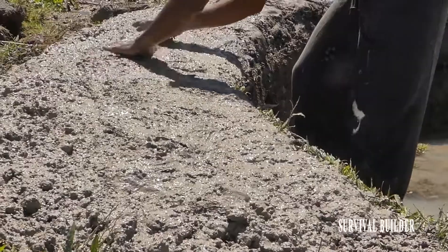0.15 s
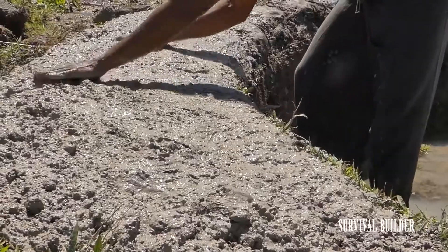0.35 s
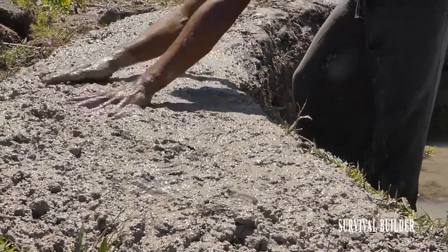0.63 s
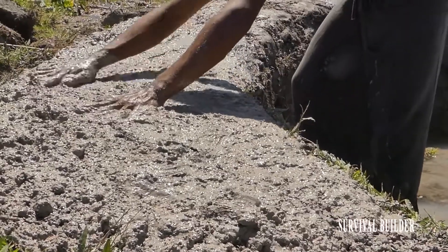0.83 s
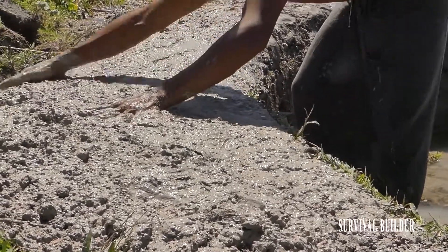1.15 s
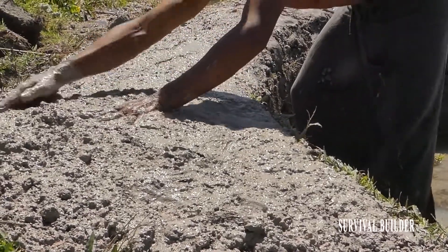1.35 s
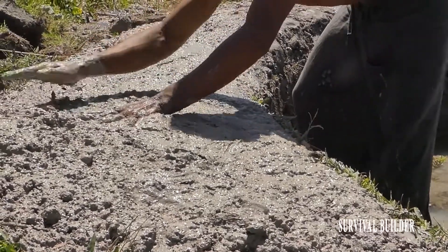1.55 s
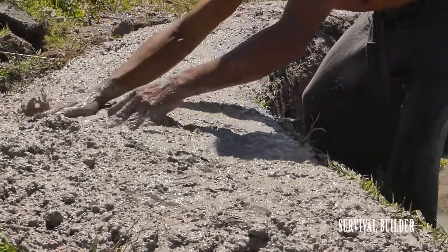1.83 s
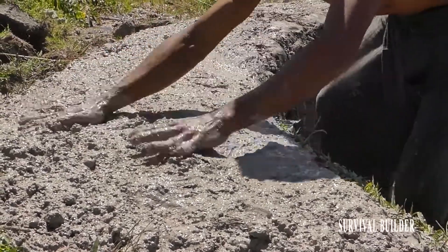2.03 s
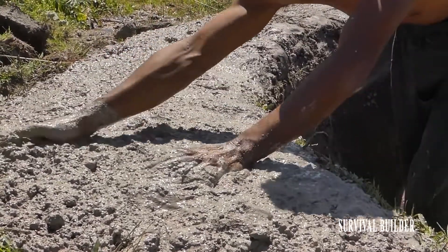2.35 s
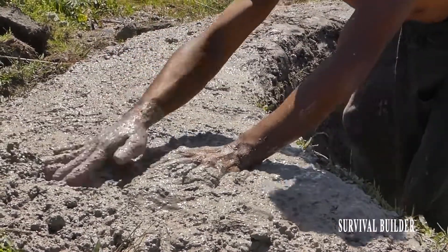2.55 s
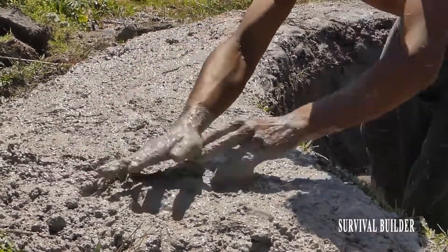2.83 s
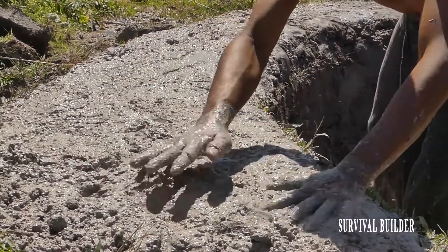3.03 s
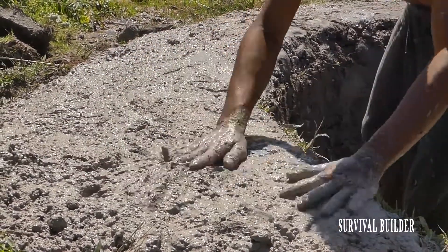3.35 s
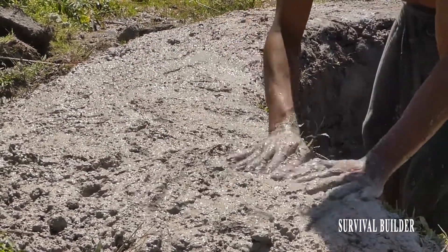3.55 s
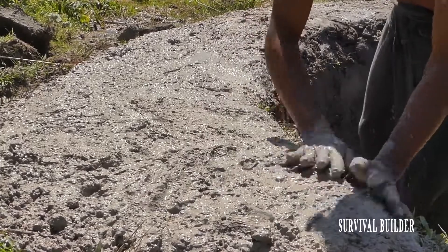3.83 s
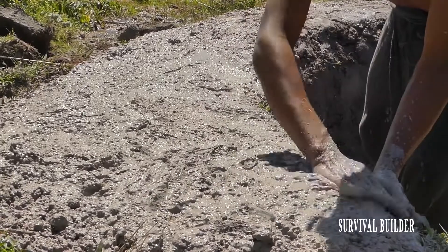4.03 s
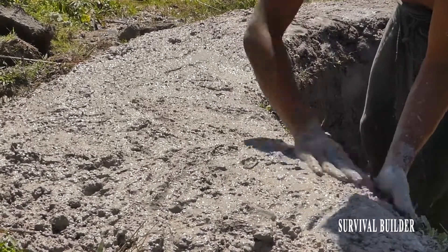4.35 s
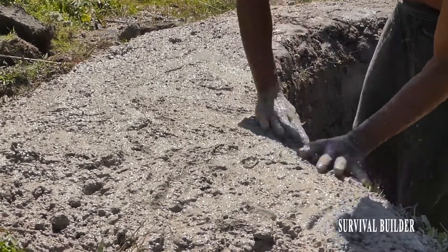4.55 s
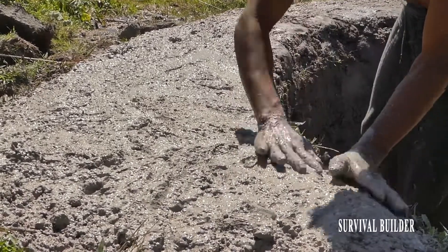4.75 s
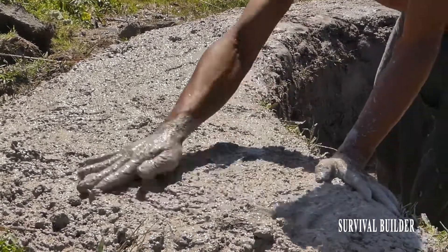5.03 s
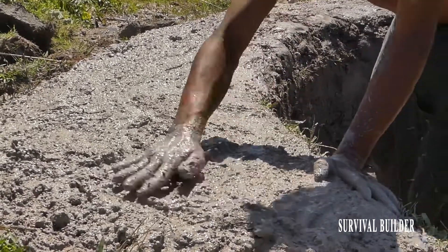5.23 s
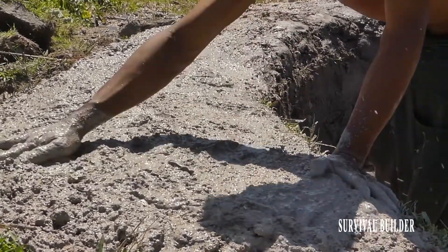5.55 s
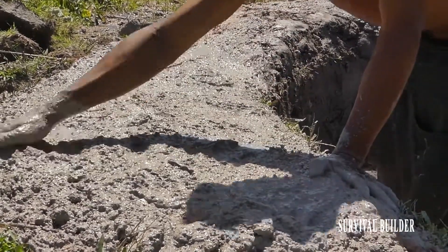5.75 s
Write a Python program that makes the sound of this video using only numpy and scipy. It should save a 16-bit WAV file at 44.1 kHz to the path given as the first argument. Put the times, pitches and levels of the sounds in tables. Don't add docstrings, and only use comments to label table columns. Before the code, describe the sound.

Bare palms pat and rub wet gritty mix outdoors, with sharp wet slaps, clicks and pops over soft fizz, hiss and a distant chugging engine.

```python
import sys
import numpy as np
from scipy import signal
from scipy.fft import rfft, irfft, next_fast_len
from scipy.io import wavfile
from scipy.ndimage import map_coordinates

SR = 44100
rng = np.random.default_rng(int(sys.argv[2]) if len(sys.argv) > 2 else 0)


def wav_record(signal):
    frames = np.transpose(np.atleast_2d(signal))
    bounded = np.clip(frames, -1, 1)
    quanta = np.round(bounded * 32767).astype(np.int16)
    wavfile.write(sys.argv[1], SR, quanta)


def rack_gain(trim_db):
    fader = np.asarray(trim_db, float)
    return 10 ** (fader / 20)


N = 259308


def unit(x):
    return x / np.sqrt(np.mean(x ** 2) + 1e-20)


def wobble(rate):
    knots = rng.standard_normal(int(N * rate / SR) + 4)
    return map_coordinates(knots, [np.arange(N) * rate / SR])


def noise(spectrum, alike, pan_db):
    f, db = np.transpose(spectrum)
    m = next_fast_len(N)
    hz = np.fft.rfftfreq(m, 1 / SR)
    gain = rack_gain(np.interp(np.log(hz + 1), np.log(f), db, left=-120, right=-120))
    a, b = irfft(rfft(rng.standard_normal((2, m))) * gain, m)[:, :N]
    turn = np.arccos(np.clip(alike, 0, 1)) / 2
    mid, side = np.cos(turn) * a, np.sin(turn) * b
    return unit(np.array([mid + side, mid - side])) * rack_gain([[pan_db / 2], [-pan_db / 2]])


def add(out, s, x):
    at = round(s * SR)
    x = x[..., max(-at, 0):]
    part = out[..., max(at, 0):][..., :x.shape[-1]]
    part += x[..., :part.shape[-1]]


def wavelet(hz, width):
    t = np.arange(-SR // 40, SR // 40) / SR
    return -np.cos(2 * np.pi * hz * t) * np.exp(-(t / width) ** 2)


def grains(count, mid_hz, cycles, scatter_db):
    when, side = rng.random((2, count, 1))
    pitch, size = rng.standard_normal((2, count, 1))
    hz = mid_hz * np.exp(0.474 * np.clip(pitch, -1.6, 3))
    t = np.arange(256) / SR
    sizes = rack_gain(scatter_db * np.clip(size, -3, 2))
    rings = sizes * np.sin(2 * np.pi * hz * t) * np.exp(-t * hz / cycles)
    at = ((when * N).astype(int) + np.arange(t.size)).ravel()
    ports = []
    for sign in (1, -1):
        panned = rings * rack_gain(sign * 20.0 * (side - .5))
        ports.append(np.bincount(at, panned.ravel(), N)[:N])
    return unit(np.array(ports))


def engine(level_db):
    # (delay [s], level [dB], ring pitch [Hz], length [s])
    thud_train = [
        (0, -7, 94.5, 0.029),
        (0, 4, 151, 0.0034),
        (.0225, 1.5, 205, 0.0069),
        (.039, -2, 198, 0.0087),
        (.048, -9, 240, 0.017),
        (.057, -4, 200, 0.0067),
        (.069, -3, 170, 0.0067),
    ]
    # (frequency [Hz], density [dB per Hz])
    drone_colour = [(40, -9), (95, -5), (125, -2.5), (180, -5), (300, 2), (370, -18)]
    period_s, first_s = .11172, .023
    cycle, out = np.zeros(SR // 5), np.zeros(N + SR)
    for delay, db, hz, width in thud_train:
        add(cycle, 0.02497 + delay, rack_gain(db) * wavelet(hz, width))
    starts = first_s + period_s * np.arange(-1, N / SR / period_s + 1)
    for s, (late, size) in zip(starts, rng.standard_normal((len(starts), 2))):
        add(out, s + .15 + 0.00062 * late, rack_gain(1.57 * size) * cycle)
    thuds = unit(out[SR // 5:][:N]) * rack_gain([[2.5], [-3]])
    drone = noise(drone_colour, alike=0.091, pan_db=5.5)
    return rack_gain(level_db) * (rack_gain(-1.54) * thuds + rack_gain(-2.5) * drone)


def outdoors():
    # (start [s], end [s], rise over the calm [dB])
    gust_spans = [
        (1.672, 2.544, 11.5),
        (5.468, 6.1, 11),
    ]
    # (frequency [Hz], density [dB per Hz])
    breeze_colour = [(200, -58), (320, -6), (410, 0), (500, -2.5), (900, -13), (2500, -31)]
    field_colour = [(300, -39), (550, -4.5), (800, 9), (1000, 2.5), (1300, 3.5), (1900, 1.5), (2300, -27),
                    (4000, -31)]
    hiss_colour = [(1800, -18), (2600, 1), (7500, -9), (10000, 1.5), (15600, -6), (16200, -40)]
    calm_db, field_db, hiss_db, gust_edge_s = -54, -48, -57.5, 0.2
    t = np.arange(N) / SR
    breeze_db = np.full(N, float(calm_db))
    for start, end, rise_db in gust_spans:
        breeze_db += rise_db * np.clip(np.minimum(t - start, end - t) / gust_edge_s + .5, 0, 1)
    breeze = unit(rack_gain(2.2 * wobble(19))) * noise(breeze_colour, alike=0.054, pan_db=5.0)
    field = unit(rack_gain(1.96 * wobble(20))) * noise(field_colour, alike=0.2, pan_db=2.0)
    hiss = noise(hiss_colour, alike=0.24, pan_db=-7.0)
    air = rack_gain(breeze_db) * breeze + rack_gain(field_db) * field + rack_gain(hiss_db) * hiss
    return air + engine(level_db=-46.0)


def strokes():
    # (time [s], fizz level [dB])
    palm_slide = [(0.05, -45), (.25, -50.5), (.5, -47.5), (.66, -46.5), (.82, -51), (1, -46), (1.15, -55),
                  (1.35, -47), (1.63, -49), (2.5, -48), (3.45, -47.5), (3.7, -49.5), (4.3, -50),
                  (4.52, -47.5), (4.79, -48.5), (5.13, -47), (5.35, -52.5), (5.65, -45.5)]
    # (frequency [Hz], density [dB per Hz])
    fizz_colour = [(900, -2), (1400, 1), (2200, -3.5), (2800, 0), (3500, -5), (4200, -1.5), (7500, -6),
                   (10000, -6.5), (15600, -15), (16200, -40)]
    fizz_db = np.interp(np.arange(N) / SR, *np.transpose(palm_slide))
    clumps = unit(rack_gain(1.1 * wobble(14) + 1.4 * wobble(60) + 1.6 * wobble(500)))
    fizz = clumps * noise(fizz_colour, alike=0.75, pan_db=-0.5)
    pressure_db = 0.24 * (fizz_db + 47) + 1.36 * wobble(11) + 5.0 * np.minimum(wobble(45), 1.2)
    grit = grains(count=8000, mid_hz=2800, cycles=6.0, scatter_db=6.5) * rack_gain(pressure_db)
    return rack_gain(fizz_db + 1.0) * (rack_gain(-1.5) * fizz + rack_gain(-2.5) * grit)


def contacts():
    # (peak time [s], splash [dB], rise [ms], t60 [s], body
    # against splash [dB])
    flat_slaps = [(1.232, -35, 4.8, 0.1, 1.5), (1.72, -19, 4.1, 0.047, 1.5), (1.915, -18, 1.9, 0.017, 4.5),
                  (1.9212, -26, 1.8, 0.016, 4), (2.1186, -15, 4.8, 0.0086, 6),
                  (2.301, -21, 4.4, 0.045, 4.5), (2.773, -26.5, 1.8, 0.03, -2),
                  (2.785, -21, 6.8, 0.067, -0.5), (2.9664, -21.5, 1, 0.072, 5),
                  (2.9805, -22.5, 2.1, 0.014, 1), (3.064, -20.5, 2.7, 0.036, 4),
                  (3.1823, -18, 2.3, 0.044, -2.5), (3.361, -35, 14.4, 0.068, 7.5),
                  (3.4006, -22.5, 0.36, 0.019, -8), (3.405, -15.5, 1.2, 0.016, -6),
                  (3.417, -34.5, 3.1, 0.041, 14.5), (3.5752, -27, 1.2, 0.059, 5),
                  (3.8287, -31.5, 2, 0.06, 1), (5.0381, -24.5, 1, 0.015, 4), (5.268, -27, 2.5, 0.043, 5),
                  (5.465, -19.5, 1.5, 0.059, 0), (5.6016, -22.5, 1.6, 0.062, -0.5),
                  (5.78, -22.5, 4.9, 0.029, 3)]
    # (peak time [s], splash [dB], t60 [s], body against splash [dB])
    drags = [(.0913, -45.5, 0.37, 8), (0.299, -49, 0.078, 4), (.3466, -44, 0.067, 4), (0.383, -42, 0.35, 3),
             (0.5677, -40, 0.19, -1), (0.671, -35.5, 0.3, 0), (0.753, -48, 0.32, 11.5), (.96, -54, 0.63, 1),
             (1.085, -45.5, 0.42, 1.5), (1.325, -55, 0.11, 11.5), (1.8189, -47, 0.56, 4),
             (2.5961, -40, 0.14, 2), (4.482, -40.5, 0.14, -2), (4.547, -45, 0.44, -15),
             (4.845, -44.5, 0.22, 5.5), (4.9842, -53, 0.13, 19), (5.032, -39, 0.24, 6.5),
             (5.715, -50, 0.067, 6)]
    # (time [s], splash [dB], body against splash [dB])
    film_snaps = [(0.3156, -39, 5), (0.3475, -24, -1), (0.3574, -24.5, -3), (.5398, -39, -16),
                  (0.548, -37, -3), (0.9608, -25.5, -25), (1.308, -35, -13), (1.324, -24, -5),
                  (1.466, -20.5, -12), (2.1124, -27, 6), (2.2924, -23, 9.5), (2.518, -27.5, -35),
                  (2.634, -36, 10), (2.7854, -16.5, 2), (2.789, -26, -6), (3.186, -27, 18),
                  (3.36, -31.5, 4), (3.41, -28.5, 6), (3.584, -27, -13), (3.6273, -16.5, 9),
                  (3.6322, -19, -7), (3.8233, -20.5, 1.5), (4.9836, -46, 8), (5.0016, -51, 10),
                  (5.073, -32, -12), (5.264, -24.5, 4), (5.27, -14, 5), (5.276, -22, 2), (5.4646, -20.5, 3),
                  (5.6131, -24, 4)]
    # (time [s], splash [dB], body against splash [dB])
    light_dabs = [(.006, -35, -18), (0.059, -48, 9), (.272, -40.5, -3), (.4053, -47, 6), (0.434, -51, 17),
                  (0.455, -33, -2), (0.519, -36.5, 3), (0.524, -37, -6), (.9385, -46, 6), (1.016, -46.5, 7),
                  (1.204, -50, -10), (4.202, -47, -8), (4.457, -43, -2), (4.587, -41.5, 2), (4.875, -51, 0),
                  (.618, -41, 8), (.649, -63, 17), (0.741, -36.5, 3), (.849, -54.5, 19), (1.2793, -37, -4),
                  (1.346, -34, 0), (1.3605, -35.5, -1), (1.4388, -39, -2), (1.504, -46, 7),
                  (1.7119, -27, -2.5), (1.8997, -55, 18), (2.163, -34.5, 4), (2.183, -42, 9.5),
                  (2.658, -56, 23), (2.994, -37, 0), (3.138, -49, 9), (3.2052, -46, 10), (3.2608, -42, 5),
                  (3.5695, -40, 8), (3.6218, -35, 6), (3.722, -48, -20), (3.737, -50.5, 15),
                  (3.808, -45, -8), (3.8157, -37, -1), (4.978, -52, 11), (5.591, -40.5, 12.5),
                  (5.771, -36, 2)]
    drag_rise_s = 0.0087
    snap_s, dab_s = (0.00056, 0.012), (0.0021, 0.025)  # (rise [s], t60 [s])
    rows = [(s, db, ms / 1000, t60, body) for s, db, ms, t60, body in flat_slaps]
    rows += [(s, db, drag_rise_s, t60, body) for s, db, t60, body in drags]
    rows += [(s, db, *snap_s, body) for s, db, body in film_snaps]
    rows += [(s, db, *dab_s, body) for s, db, body in light_dabs]
    return rows


def splashes():
    # (frequency [Hz], density [dB per Hz])
    spray_colour = [(2500, -21.5), (4200, -7.5), (5500, -2), (6500, 0.5), (7800, -4), (11000, -2),
                    (15200, -8.5), (16600, -63)]
    slap_colour = [(300, 2), (1000, -13.5), (1300, -9), (2200, -5), (2800, 1), (3500, -4.5), (4200, -2),
                   (5500, -10)]
    spray, slap = np.zeros(N), np.zeros(N)
    t = np.arange(-SR // 32, SR // 6) / SR
    for s, db, rise, t60, body_db in contacts():
        swell = np.exp(np.minimum(t, 0) / max(rise, .0001))
        dribble = rack_gain(-26.0 - 60 * t / 0.097)
        shape = rack_gain(db) * np.where(t < 0, swell, rack_gain(-60 * t / t60) + dribble)
        add(spray, s + t[0], shape)
        add(slap, s + t[0], rack_gain(body_db) * shape)
    droplets = unit(rack_gain(4.05 * wobble(2500)))
    spray = rack_gain(-1.0) * spray * droplets * noise(spray_colour, alike=0.77, pan_db=0.0)
    body = rack_gain(-5.0) * unit(droplets ** 0.23) * noise(slap_colour, alike=0.89, pan_db=2.0)
    grit = rack_gain(-9.0) * grains(count=9000, mid_hz=2630, cycles=4.1, scatter_db=5.5)
    no_bass = signal.butter(2, 700, "high", fs=SR, output="sos")
    return signal.sosfilt(no_bass, spray + slap * (body + grit))


def pockets():
    # (time [s], peak level [dB], pitch [Hz]) small pockets popping under slaps and sliding palms
    small_pops = [(1.7196, -21, 1790), (1.92, -20.5, 475), (5.2705, -14, 555), (1.914, -10, 1730),
                  (1.9196, -5.5, 1500), (2.1123, -13, 3000), (2.294, -24, 2320), (2.3006, -11, 3200),
                  (2.7849, -8, 3600), (2.9668, -2.5, 4120), (2.9674, -22.5, 1160), (2.9936, -22, 1430),
                  (3.0659, -7, 2900), (3.1865, -8.5, 1160), (3.1859, -2.5, 2600), (3.1878, -15, 3050),
                  (3.262, -21, 1870), (3.266, -34, 1340), (3.5762, -12, 1800), (3.6274, -5.5, 2750),
                  (3.8266, -5, 4120), (5.2672, -10.5, 1770), (5.2695, -10, 2940), (5.6025, -9.5, 2960),
                  (0.056, -23.5, 1360), (0.0907, -24, 1400), (.132, -32, 555), (.153, -27, 1320),
                (0.3494, -18.5, 3230), (0.3579, -21, 1750), (.361, -27, 1420), (.381, -30, 1900),
                (.65, -24, 1540), (.5522, -20.5, 2740), (0.6698, -19, 1560), (0.6868, -22.5, 2020),
                (.7552, -18.5, 2680), (1.2325, -24, 3190), (1.2346, -27, 3730), (1.2372, -37, 1310),
                (1.325, -24.5, 1600), (1.437, -24, 1290), (1.585, -32, 1250), (2.598, -32.5, 590),
                (2.668, -31.5, 585), (4.486, -32, 2850), (4.847, -25.5, 4070), (4.9845, -17, 1740),
                (5.002, -15, 2850), (5.025, -23, 4060), (5.0326, -23, 2430), (5.0376, -13.5, 4800),
                (5.047, -27, 2900), (5.0986, -25.5, 2800)]
    free_bubbles = [(.102, -31, 1330), (1.085, -31.5, 2180), (1.4636, -23.5, 3700), (1.7184, -15.5, 3200),
                    (1.9196, -16, 2580), (2.1186, -25, 1790), (2.1177, -7.5, 2840), (2.3013, -18, 1760),
                    (2.7884, -17, 2620), (2.9807, -15, 1366), (3.3607, -25, 2900), (3.427, -26, 2800),
                    (3.5766, -32, 2860), (3.6292, -16.5, 1227), (3.7047, -31, 2230), (4.1361, -32, 1224),
                    (4.551, -29.5, 1125), (4.9847, -26, 2710), (5.0984, -31.5, 1184), (5.2709, -10.5, 4140),
                    (5.4672, -21, 2800), (5.6104, -22, 4130), (5.7814, -31.5, 805), (5.78, -16, 3570)]
    palm_cups = [(.7235, -25.5, 358), (1.7204, -23.5, 680), (2.108, -25, 1210), (2.7763, -15.5, 940),
                 (3.1861, -14, 670), (3.4075, -10, 1600), (3.581, -23, 1140), (3.6282, -22, 525),
                 (5.281, -31, 556), (5.056, -27.5, 596), (5.4678, -6.5, 1460), (5.4685, -15, 770),
                 (5.4726, -19.5, 1220), (5.6044, -20, 780)]
    wet_grains = [(0.052, -32, 3020), (0.3477, -31, 6890), (0.3582, -34, 6950), (0.357, -31, 4480),
                  (0.3582, -32, 5600), (0.3805, -34, 2650), (0.3826, -32, 4870), (0.4061, -35, 1630),
                  (0.411, -35, 1520), (0.4585, -36, 5860), (0.569, -30, 5500), (0.669, -32, 4660),
                  (0.722, -32.5, 1510), (0.9846, -31, 2850), (1.3345, -33, 1750), (1.3449, -30, 4740),
                  (1.345, -48, 1030), (1.58, -40, 1250), (1.8987, -34, 1610), (1.916, -15.5, 2580),
                  (1.9204, -26, 6200), (2.1612, -29, 3030), (2.293, -25, 7060), (2.3, -11, 4970),
                  (2.3068, -25, 5000), (2.5997, -34, 2220), (2.7847, -30, 5850), (2.801, -30, 2500),
                  (2.9677, -22, 7020), (2.967, -14, 3250), (2.9667, -12, 5730), (2.9767, -35, 5680),
                  (2.9937, -35, 7240), (3.066, -21.5, 1870), (3.0655, -11, 4110), (3.1853, -15, 1840),
                  (3.3534, -31, 2750), (3.3533, -32, 1870), (3.362, -18, 6800), (3.4005, -20, 4120),
                  (3.408, -24, 3790), (3.41, -19, 2800), (3.4117, -31, 5470), (3.5789, -37, 6500),
                  (3.5846, -25, 4000), (3.6287, -7.5, 6370), (3.815, -29, 4050), (3.8276, -16, 5200),
                  (4.9843, -27, 4060), (5.0071, -34, 1360), (5.0266, -28, 3040), (5.0331, -29, 1960),
                  (5.045, -32.5, 1260), (5.045, -25, 2840), (5.275, -18, 7280), (5.4664, -19, 2800),
                  (5.4855, -34, 1290), (5.6028, -28, 5600), (5.6033, -20.5, 4130), (5.6028, -28, 4960)]
    low_squelches = [(1.3449, -35, 940), (1.6812, -34, 690), (1.917, -27.5, 315), (1.921, -18.5, 710),
                     (2.1087, -32, 420), (2.117, -50, 784), (2.3, -41, 560), (2.654, -38, 770),
                     (2.9772, -8, 1410), (2.9787, -21, 1110), (3.4202, -31, 850), (3.587, -36, 950),
                     (3.6315, -23, 840), (3.7035, -34, 1830), (3.8275, -17.5, 1840), (4.9423, -34, 840),
                     (5.2699, -14, 1810), (5.4745, -23.5, 685), (5.441, -35, 1780), (5.78, -39, 356),
                     (5.603, -33, 420), (3.405, -31, 590), (5.2805, -32, 1250), (5.287, -33.5, 526),
                     (5.484, -32, 1120), (5.722, -34, 850)]
    fine_grains = [(0.0913, -28, 1370), (0.1098, -42, 5680), (0.1442, -34, 4010), (0.3158, -29, 4870),
                   (0.3482, -29, 4280), (0.3482, -32, 5600), (0.3572, -33, 1720), (0.3582, -32, 4440),
                   (0.3582, -33, 5600), (0.4061, -37, 5120), (0.431, -36, 3660), (0.4395, -32, 2220),
                   (0.4575, -42, 4600), (0.459, -33, 5900), (0.5193, -41, 2200), (0.5393, -32, 4880),
                   (0.5527, -33, 6100), (0.5687, -34, 2280), (0.5692, -32, 5400), (0.5827, -38, 5250),
                   (0.5837, -30, 4300), (0.6161, -33, 3790), (0.669, -37, 5570), (0.669, -32, 4740),
                   (0.677, -30, 2330), (0.7219, -31, 2280), (0.7408, -37, 5550), (0.7543, -35, 4390),
                   (0.7558, -28, 2150), (0.7683, -32, 3680), (0.9394, -41, 5700), (0.9952, -39, 5080),
                   (1.095, -37, 1850), (1.2297, -41, 5940), (1.2352, -42, 3850), (1.2377, -33.5, 1320),
                   (1.2761, -32, 4440), (1.2841, -35, 2800), (1.3105, -36, 4520), (1.3245, -25, 6460),
                   (1.325, -34, 2710), (1.3444, -35, 4690), (1.3529, -31, 6500), (1.3544, -38, 5300),
                   (1.3544, -29, 4500), (1.4382, -31, 1310), (1.4502, -35, 5640), (1.4637, -34, 2800),
                   (1.4667, -45, 5230), (1.5051, -36, 2690), (2.5178, -45, 5530), (2.6166, -38, 3750),
                   (2.657, -32, 3880), (4.2005, -35, 4860), (4.4599, -35, 3050), (4.4858, -29, 2900),
                   (4.6684, -40, 3420), (4.7751, -35, 5230), (4.853, -36, 3050), (4.8759, -32, 4000)]
    film_spits = [(.2985, -26, 10600), (.3425, -29, 9600), (.3475, -22, 13000), (.382, -32, 10100),
                  (.393, -30, 10000), (.4525, -14.5, 12500), (.5195, -22, 10700), (.5255, -35, 8200),
                  (.643, -36, 12100), (.6545, -24, 11700), (.741, -30, 12700), (.789, -33, 11500),
                  (.917, -37, 11300), (.9595, -18, 10400), (.981, -31, 9500), (1.0925, -33, 12500),
                  (1.2795, -20.5, 11500), (1.4365, -25, 11400), (1.4945, -32, 12400), (4.793, -29, 10800),
                  (4.806, -30, 12400), (4.828, -34, 7500), (5.056, -33, 10000), (3.476, -35, 10500),
                  (3.491, -32, 9100)]
    # (events, ring length [cycles], gain [dB])
    kinds = [(small_pops, 5.3, 0), (free_bubbles, 15.7, 0), (palm_cups, 2.6, 0),
             (wet_grains, 10.2, 4), (low_squelches, 5.6, 0), (fine_grains, 13, 0), (film_spits, 7.5, 0)]
    slack_hz, slack_damps = 860, 0.33
    rows = []
    for table, cycles, gain_db in kinds:
        for s, db, hz in table:
            length = cycles / hz * min(hz / slack_hz, 1) ** slack_damps
            rows.append((s, db + gain_db, hz, length))
    out = np.zeros((2, N))
    for (s, db, hz, length), (phase, lag) in zip(rows, rng.random((len(rows), 2))):
        u = np.linspace(-1.5, 2.5, round(4 * length * SR))
        shape = np.exp(-np.where(u < 0, 22 * u * u, 3 * u))
        turn = 2 * np.pi * (hz * length * (u + 0.0027 * u * u) + phase)
        pan_db = max(3.9 * np.log2(4000 / hz), -2)
        left = rack_gain(pan_db / 2) * np.sin(turn)
        right = rack_gain(-pan_db / 2) * np.sin(turn + 1.0 * (lag - .5))
        add(out, s - 1.5 * length, rack_gain(db - 2.0) * shape * np.array([left, right]))
    flutter = unit(rack_gain(1.1 * wobble(400)))
    return out * flutter


def thumps():
    # (time [s], peak level [dB])
    hand_pushes = [
        (1.712, -38),
        (1.912, -33),
        (2.112, -39),
        (2.974, -35.5),
        (3.186, -30),
        (3.622, -38),
        (5.264, -36),
        (5.459, -32),
    ]
    out = np.zeros(N)
    for s, db in hand_pushes:
        add(out, s + 0.0062 - 1 / 40, rack_gain(db + 6.5) * wavelet(hz=225, width=0.0026))
    return out * rack_gain([[4], [-5]])


def scene():
    hands = splashes() + pockets() + thumps()
    t = np.arange(SR // 2) / SR
    load = signal.fftconvolve(np.mean(hands ** 2, 0), np.exp(-t / 0.11))[:N]
    duck = 1 / (1 + 0.09 * np.abs(load)) ** 0.45
    return hands + duck * (strokes() + outdoors())


def top_cut(x):
    return signal.sosfilt(signal.butter(12, 16960, fs=SR, output="sos"), x)


def record(dry):
    x = signal.sosfiltfilt(signal.butter(2, 48, "high", fs=SR, output="sos"), dry)
    x = x / (1 + np.abs(x / 0.9) ** 6) ** (1 / 6)
    x = signal.filtfilt(*signal.iirnotch(7500, 110, SR), x)
    return top_cut(x)


dry = scene()
out = record(dry)
wav_record(out)
```